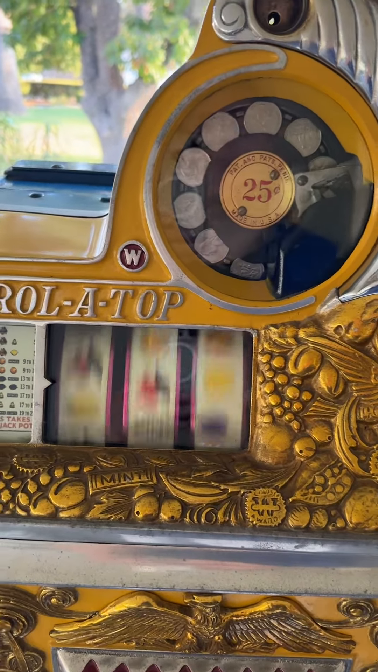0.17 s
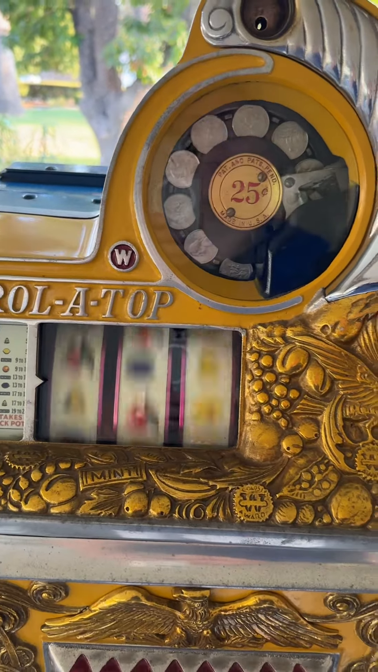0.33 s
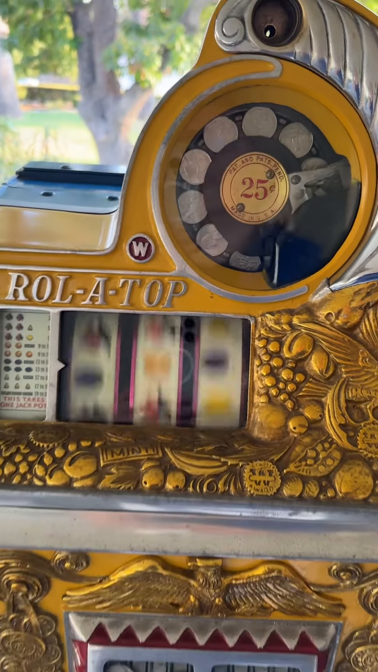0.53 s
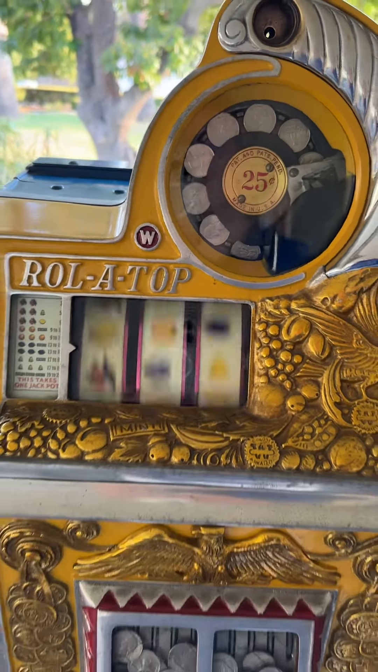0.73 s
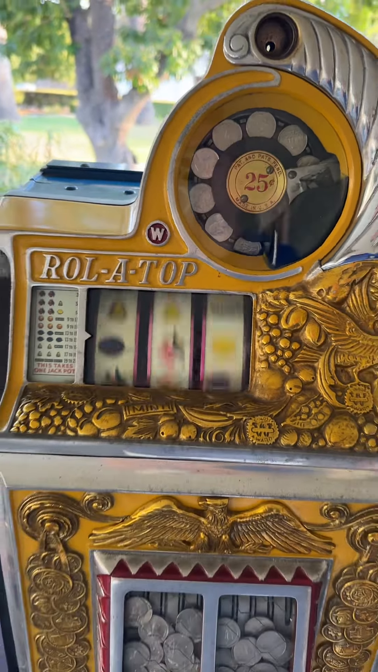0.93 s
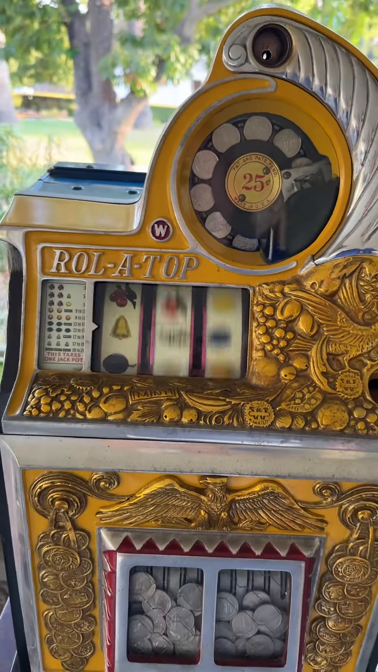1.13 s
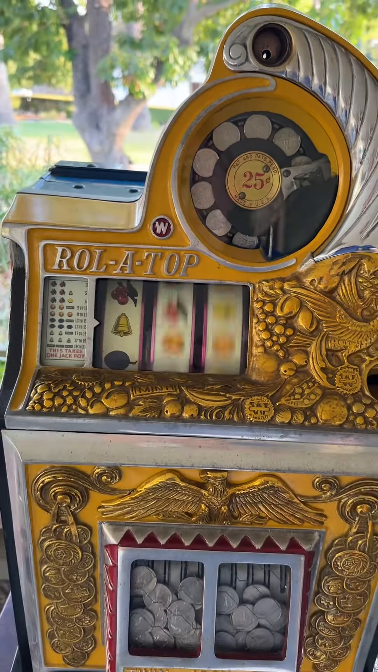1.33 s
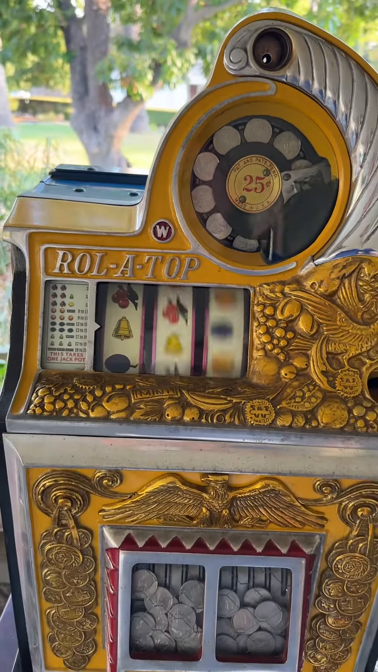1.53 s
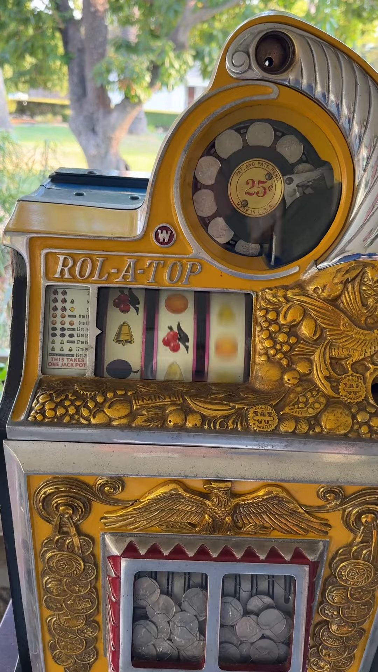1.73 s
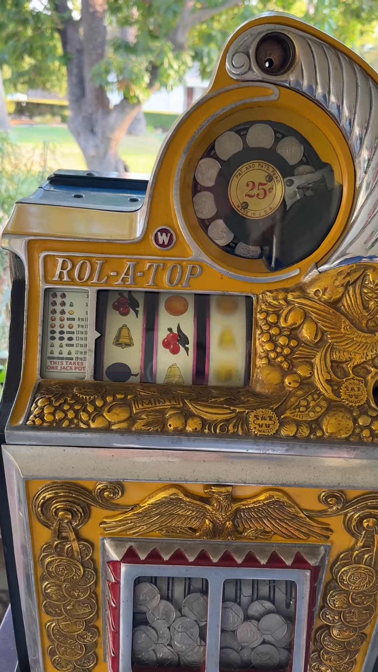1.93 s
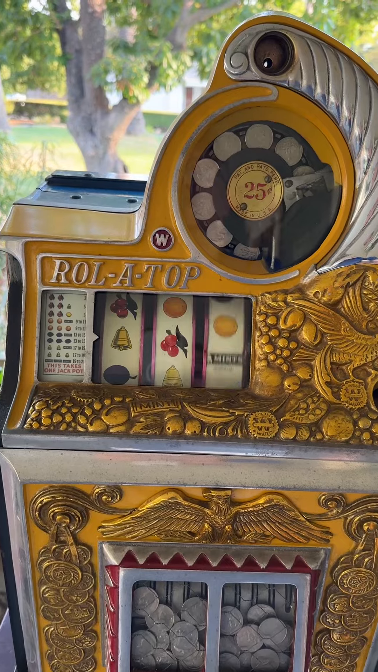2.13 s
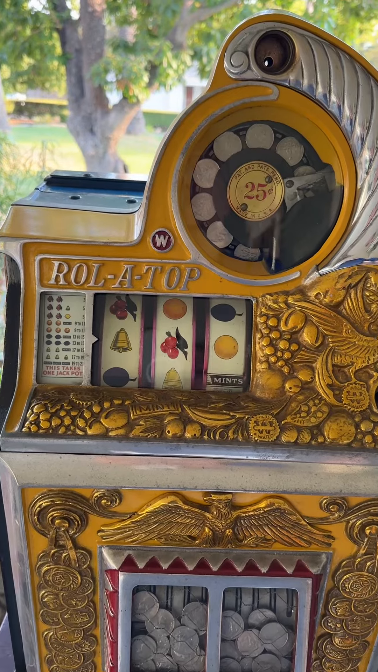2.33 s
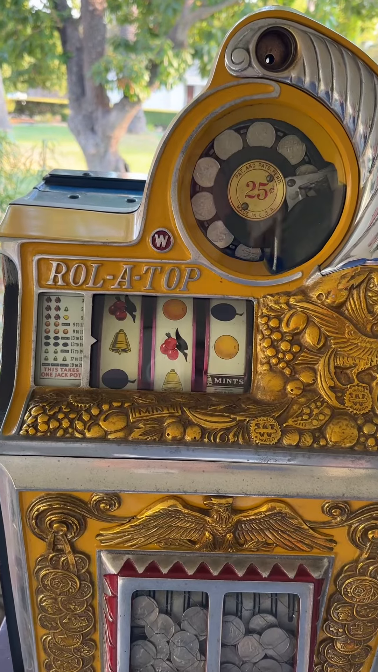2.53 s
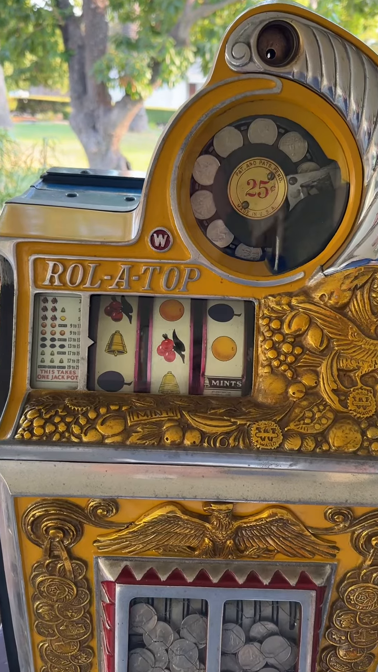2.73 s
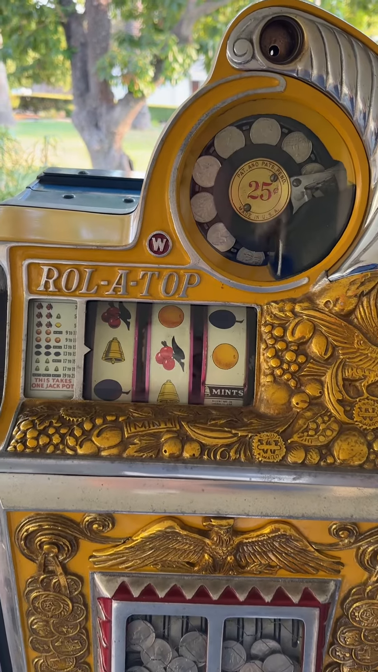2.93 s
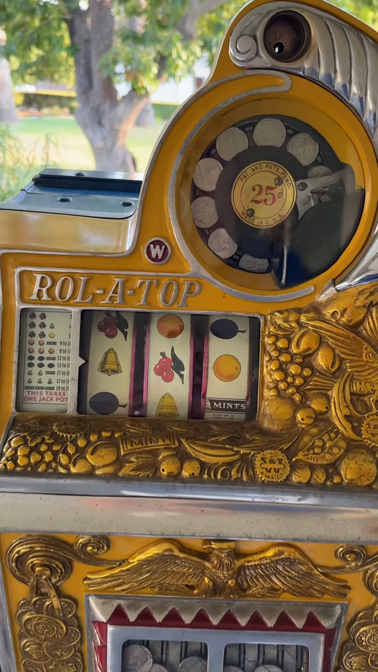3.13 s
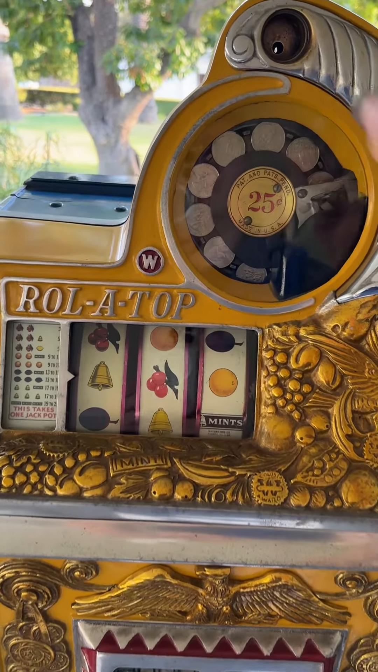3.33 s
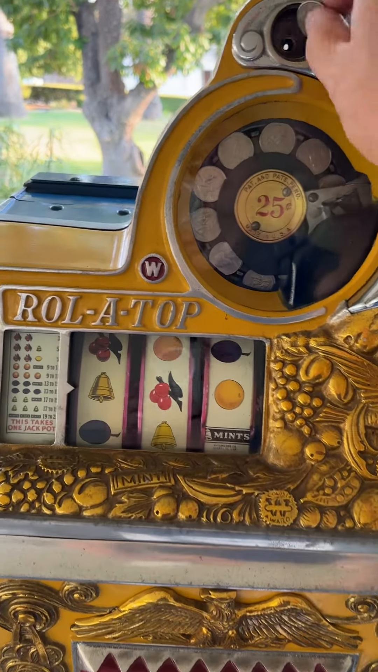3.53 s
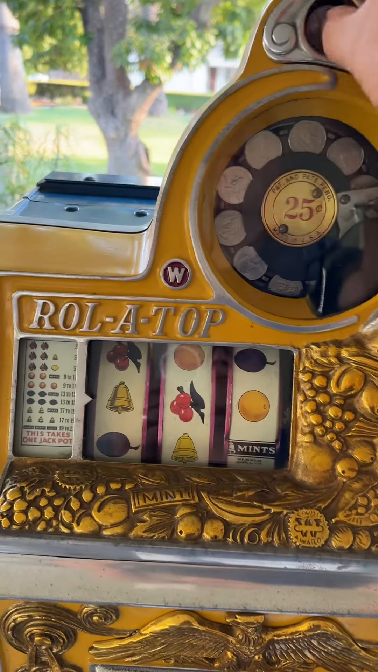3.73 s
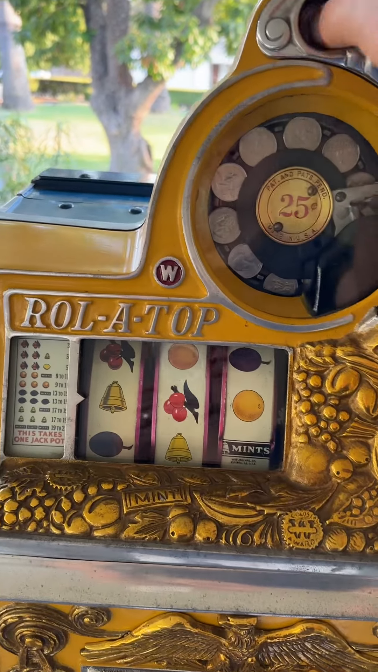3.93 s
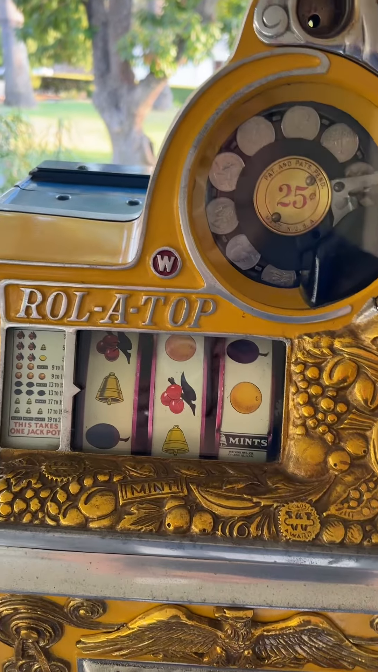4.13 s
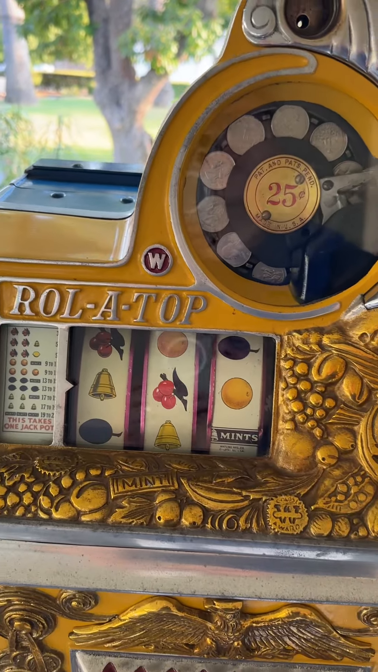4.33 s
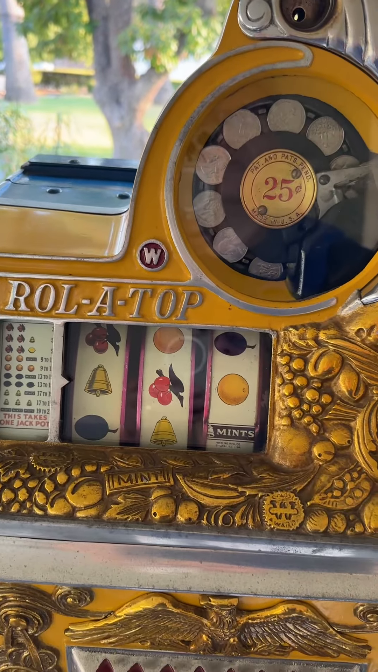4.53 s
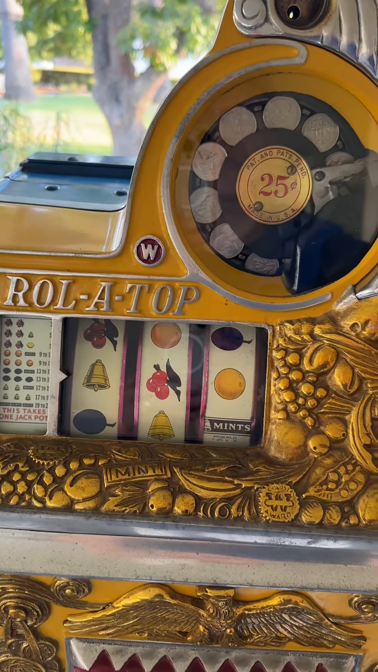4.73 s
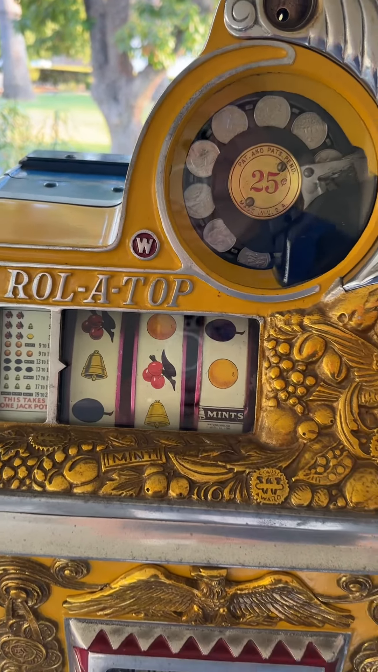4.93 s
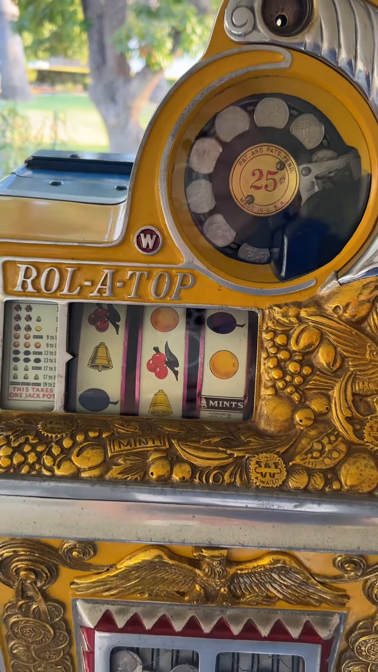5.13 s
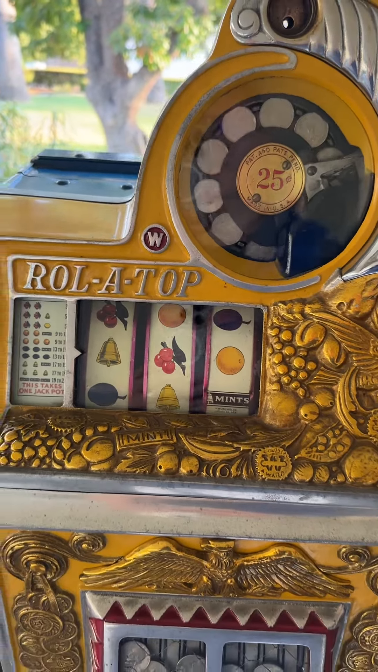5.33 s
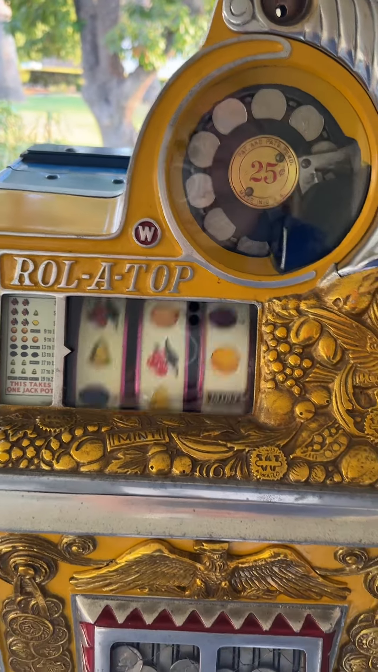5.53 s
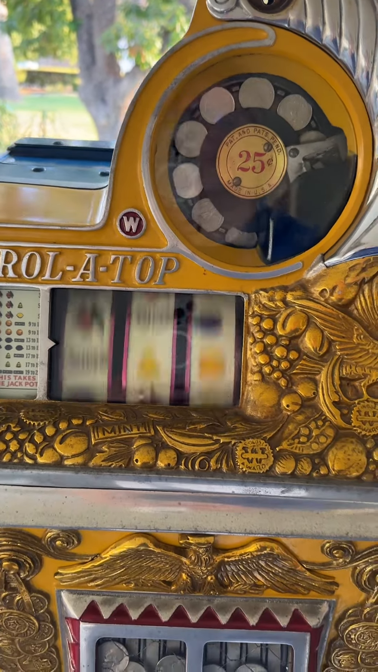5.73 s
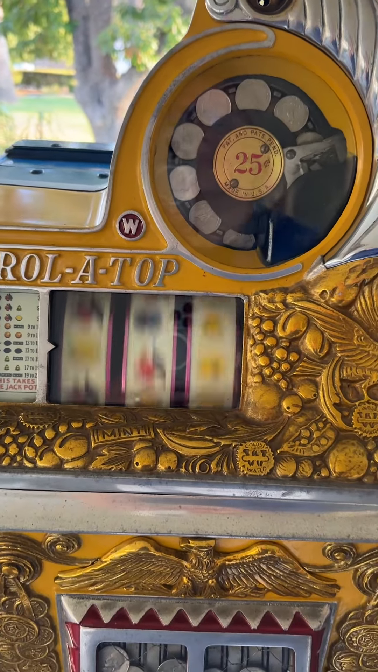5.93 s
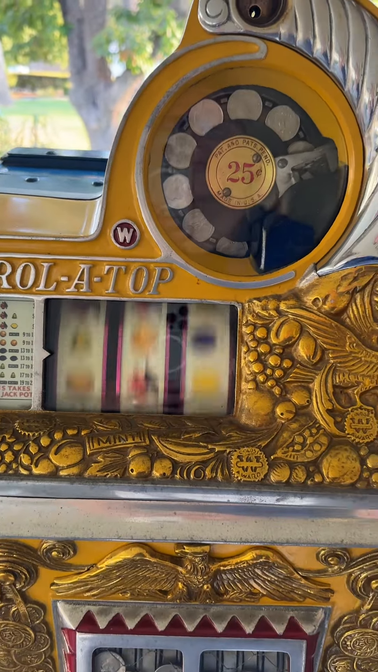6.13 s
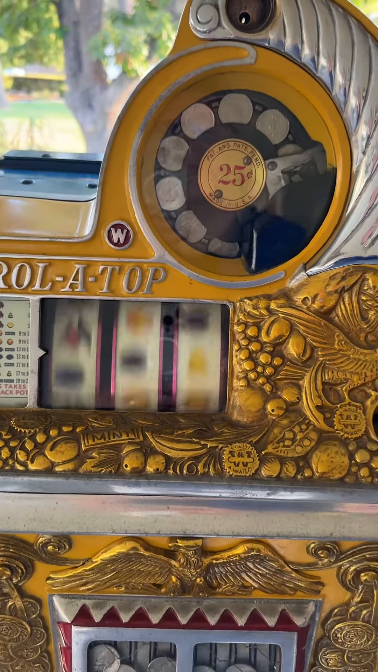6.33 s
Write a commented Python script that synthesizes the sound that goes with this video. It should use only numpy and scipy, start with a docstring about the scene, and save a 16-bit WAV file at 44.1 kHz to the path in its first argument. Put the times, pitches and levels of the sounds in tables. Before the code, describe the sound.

An old mechanical slot machine rattles, its reels lock with ringing clacks, a coin rolls in, and the handle ratchets another spin.

```python
"""Mechanical slot machine outdoors

Three reels spin, then lock one by one with a ringing, bouncing lever. The pay slides snap, a coin rolls
down the chute, the handle cocks the springs, and the same ratchet run-up and knock start the next spin.
Noise bursts make the clashes and shake the metal case; fading sine waves make the ringing parts.
Soft bumps and a low outdoor rumble lie underneath."""
import sys
import numpy as np
from scipy import signal
from scipy.fft import rfft, irfft, next_fast_len
from scipy.io import wavfile
from scipy.ndimage import map_coordinates

SR = 44100
rng = np.random.default_rng(int(sys.argv[2]) if len(sys.argv) > 2 else 0)


def store_pcm(level_fs):
    """Save levels as 16-bit WAV."""
    pcm = np.round(np.clip(level_fs, -1, 1) * 32767).astype(np.int16)
    wavfile.write(sys.argv[1], SR, np.atleast_2d(pcm).T)


N = 285768  # length in samples

# Levels in the tables are relative: gains in the functions set the final loudness.
# A t60 is the time in which a sound fades by 60 dB.
# In every pair of signals, the first is the middle of the stereo picture (mid), the second its width (side).

# Every spin ends its run-up with the same knock.
# Each row: knock time in seconds, strength in dB, strength of the cabinet and case in dB.
SPINS = [(0.2777, -1, 0), (6.2176, -1, -0.5)]
# The handle draws the springs, then lets go.
# Each row: start in seconds, length in seconds, level of the teeth in dB, level of the case in dB.
STROKES = [(5.026, .405, -36, -38.5), (5.506, 0.11, -27.5, -26)]
# What the ticking and rolling coin has in common. Each row: frequency in Hz, level in dB per Hz.
TICK = [(300, -28), (700, -11.5), (1200, -15), (1900, -12.5), (3000, -12.5), (5000, -6.5), (7000, -5),
        (9000, -1), (11000, -1), (13000, -5.5), (16000, -10)]
TEETH_RISE_S = 0.14  # the gear teeth take this long to engage fully


def amp(db):
    """Turn decibels into a gain."""
    return 10 ** (np.asarray(db) / 20)


def unit(x):
    """Scale to an average strength (rms) of 1."""
    return x / np.sqrt(np.mean(x ** 2) + 1e-20)


def along(points, hz):
    """Read a curve of (Hz, value) points between its points, on a log frequency axis."""
    f, v = np.transpose(points)
    return np.interp(np.log(hz + 1), np.log(f + 1), v)


def gains(rows):
    """Turn each dB column into a gain per sample, silent outside the rows."""
    s, *columns = np.transpose(rows)
    t = np.arange(N) / SR
    return np.array([np.interp(t, s, amp(db), left=0, right=0) for db in columns])


def wobble(rate):
    """Make a smooth random curve with this many random points a second."""
    points = rng.standard_normal(int(N * rate / SR) + 4)
    return map_coordinates(points, [np.arange(N) * rate / SR])


def filtered(x, response):
    """Change the strength and phase of each frequency as the response function says."""
    size = 2 * next_fast_len(N // 2 + SR // 4)
    hz = np.fft.rfftfreq(size, 1 / SR)
    return irfft(rfft(x, size) * response(hz), size)[..., :N]


def coloured(x, spectrum):
    """Give a sound this spectrum without smearing it ahead in time; white noise keeps its power."""
    size = 8192
    strength = unit(amp(along(spectrum, np.fft.rfftfreq(size, 1 / SR))))
    # Folding the cepstrum forward in time gives a filter that answers only after its input.
    cepstrum = irfft(np.log(strength))
    cepstrum[1:size // 2] *= 2
    cepstrum[size // 2 + 1:] = 0
    answer = irfft(np.exp(rfft(cepstrum)))
    return signal.oaconvolve(x, answer[None], axes=1)[:, :N]


def resonant(x, peaks):
    """Pass a sound through a few (Hz, width Hz, dB) resonances; white noise keeps its power."""
    def response(f):
        total = 0
        for k, (centre, width, db) in enumerate(peaks):
            peak = 1j * f * width / (centre * centre - f * f + 1j * f * width)
            total = total + (-1) ** k * amp(db) * peak  # alternating signs
        return total / np.sqrt(np.mean(np.abs(total) ** 2))
    return filtered(x, response)


def add(track, s, sound):
    """Mix a sound into a track at time s, cutting what runs past the end."""
    start = max(round(s * SR), 0)
    part = track[..., start:][..., :sound.shape[-1]]
    part += sound[..., :part.shape[-1]]


def grit(rate, depth_db):
    """Make stereo noise of rms 1 whose level flickers as if broken into tiny contacts."""
    return unit(rng.standard_normal((2, N)) * amp(depth_db * wobble(rate)))


def blows(times, dbs, t60, attack, tail_db, tail_t60, chatter_db, scrape_db=-60):
    """Parts scrape as they close; the blow is a noise burst, then a faint, duller wash inside the case."""
    strike, wash = np.zeros((2, N))  # power over time
    t = np.arange(SR // 2) / SR
    approach = np.linspace(0, 1, SR // 70) ** 2
    rise = (1 - np.exp(-t / attack)) ** 2
    decay = rise * np.exp(-2 * np.log(1000) * t / t60)
    tail = rise * np.exp(-2 * np.log(1000) * t / tail_t60)
    for s, power in zip(times, amp(dbs) ** 2):
        add(strike, s - len(approach) / SR, power * amp(scrape_db) ** 2 * approach)
        add(strike, s, power * decay)
        add(wash, s, power * tail)
    dull = signal.butter(3, 10000, fs=SR)
    wash_noise = signal.lfilter(*dull, np.sqrt(wash) * rng.standard_normal((2, N)))
    return np.sqrt(strike) * grit(500, chatter_db) + amp(tail_db) * wash_noise


def rings(times, dbs, modes, attack, scatter_db, detune=0, scramble=1):
    """Each blow rings the (Hz, dB, t60 s) modes as fading sines, with new strengths and slight pitch shifts."""
    track = np.zeros((2, N))
    t = np.arange(SR // 3) / SR
    hz, level, t60 = np.transpose(modes)[:, :, None]
    decay = (amp(level - 60 * t / t60) * (1 - np.exp(-t / attack))).astype("float32")
    turning = (2 * np.pi * hz * t).astype("float32")
    for s, db in zip(times, dbs):
        strength, shift = rng.standard_normal((2, len(modes), 1))
        # With little scramble, the modes start together as one push.
        phase = (2 * np.pi * scramble * rng.random((2, len(modes), 1))).astype("float32")
        stretch = (1 + detune * shift).astype("float32")
        waves = np.sin(turning * stretch + phase)
        level_now = amp(db + scatter_db * strength).astype("float32")
        add(track, s, np.sum(level_now * decay * waves, axis=1))
    return track


def fresh_resonances(x, times, band_hz, count, width_hz, scatter_db):
    """Each blow lands on another spot, so it wakes a new set of many narrow resonances."""
    size = 4096
    decay = np.exp(-np.pi * width_hz * np.arange(size) / SR)
    starts = np.sort(np.clip(np.round(np.asarray(times) * SR), 0, N))
    edges = np.concatenate([[0], starts, [N]]).astype(int)
    rung = np.zeros((2, N))
    for first, last in zip(edges[:-1], edges[1:]):
        hz = np.interp(np.arange(count) + rng.random(count), [0, count], band_hz)
        strength = rng.choice([-1, 1], count) * amp(scatter_db * rng.standard_normal(count))
        lines = np.bincount(np.round(hz * size / SR).astype(int), strength)
        ring = decay * irfft(lines, size)
        ring = ring[None] / np.linalg.norm(ring)
        if last > first:
            add(rung, first / SR, signal.fftconvolve(x[:, first:last], ring, axes=1))
    return rung


def steel(x, times, spectrum, count, width_hz, scatter_db):
    """Small steel parts add many narrow, uneven resonances to a noisy clash."""
    rung = fresh_resonances(x, times, (900, 16000), count, width_hz, scatter_db)
    return coloured(amp(-3) * x + amp(-.5) * rung, spectrum)


def casing(shake, times):
    """The case answers with its main resonances and with panel modes that change from blow to blow."""
    # Main resonances of the metal case. Each row: frequency in Hz, width in Hz, level in dB.
    case_peaks = [(351, 44, 6), (521, 35, 12), (713, 37, 2), (827, 17, 11), (896, 25, -4), (1126, 110, 4.5),
                  (1219, 43, 4), (1622, 150, 0), (1612, 61, 5.5), (2080, 80, -7.5), (2610, 130, -5.5)]
    # Overall colour of the clack. Each row: frequency in Hz, level in dB per Hz.
    clack_spectrum = [(50, -42), (120, -6), (260, 12.5), (420, -7.5), (700, 6), (1200, 1.5), (2000, -3),
                      (3200, -7.5), (5000, -24), (12000, -52.5)]
    panels = fresh_resonances(shake, times, (200, 3200), count=36, width_hz=32, scatter_db=3)
    direct = amp(-7.5) * coloured(shake, clack_spectrum)
    return direct + amp(-15.5) * coloured(panels, clack_spectrum) + amp(-7.0) * resonant(shake, case_peaks)


def outdoors():
    """Noise makes a gently uneven low rumble under faint, steady air."""
    # How the low background swells. Each row: time in seconds, rumble level in dB.
    rumble_levels = [(0.0, -36), (0.32, -36.5), (0.65, -44), (1.51, -51.5), (1.71, -40.5), (3.3, -46.5),
                     (3.68, -37.5), (4.08, -30), (4.15, -44.5), (4.42, -44), (4.64, -77), (4.9, -51.5),
                     (5.77, -34.5), (6.48, -43)]
    # Colours of the rumble and the air. Each row: frequency in Hz, level in dB per Hz.
    rumble_spectrum = [(20, -41.5), (32, -16), (48, 3), (70, 6), (110, -1), (160, -5), (260, -16.5),
                       (400, -38.5), (900, -56)]
    air_spectrum = [(60, -8), (150, 0), (280, 1.5), (450, -6), (900, -12.5), (1500, -17.5), (2500, -24.5),
                    (5000, -31), (9000, -39.5), (12000, -58), (16000, -58)]
    low = gains(rumble_levels) * coloured(grit(9, depth_db=1.5), rumble_spectrum)
    air = coloured(rng.standard_normal((2, N)), air_spectrum)
    width = amp([[0], [6]])  # the open air is wider than the machine
    return amp(2.5) * low + amp(-50.0) * air * width


def bumps():
    """Soft pushes swing a few low cycles, some with a dull knock."""
    # Each row: start in seconds, thud level in dB, thud pitch in Hz, knock level in dB.
    pushes = [(0.197, -19.5, 60.8, -30), (0.423, -20.5, 71.3, -37.5), (0.621, -21.5, 69.8, -55.5),
              (1.76, -25, 54.5, -40), (2.699, -20, 70, -36), (3.464, -16.5, 76, -35),
              (3.532, -23, 57.1, -59), (3.625, -21.5, 66.7, -56), (3.68, -21, 62.2, -57),
              (3.737, -21, 61, -67), (3.813, -17.5, 63.5, -63.5), (3.859, -18, 76.1, -61),
              (3.898, -21.5, 76.6, -56.5), (3.927, -19, 121, -20), (3.974, -15.5, 73.4, -42.5),
              (4.054, -20.5, 83.4, -41), (4.092, -13.5, 79.2, -31.5), (4.252, -35, 91, -42.5),
              (4.391, -30.5, 76.6, -33), (4.475, -29, 71.3, -38), (5.573, -10, 123.7, -39)]
    swell_cycles = 1.25  # a bump swells over this many swings and dies as quickly
    thud = np.zeros((2, N))
    t = np.arange(SR // 6) / SR
    for s, db, hz, _ in pushes:
        u = t * hz / swell_cycles
        add(thud, s, amp(db) * u ** 2 * np.exp(1 - u ** 2) * np.sin(2 * np.pi * hz * t))
    s, _, _, knock_db = np.transpose(pushes)
    knock = blows(s, knock_db + 8.5, 0.054, attack=0.0017, tail_db=-22.0, tail_t60=0.37, chatter_db=0.5)
    dull = [(60, -1.5), (170, 15.0), (300, 2.5), (520, -11.0), (900, -48), (2500, -62.5)]  # (Hz, dB per Hz)
    return thud + coloured(knock, dull)


def handle():
    """The handle knocks dully as it takes up its slack; then the stretching main spring groans."""
    # The handle meeting its stops. Each row: time in seconds, level in dB.
    slack_knocks = [(4.78, -28.5), (4.9005, -26)]
    # Resonances of those knocks. Each row: frequency in Hz, width in Hz, level in dB.
    slack_body = [(258, 32, 5), (387, 63, -3), (513, 51, 4.5), (701, 56, 0.5), (990, 170, -9.5),
                  (1590, 240, -15.5)]
    # The spring. Each row: start in seconds, length in seconds, first pitch in Hz, last pitch in Hz, level in dB.
    groans = [(5.082, 0.11, 216, 307, -33), (5.384, 0.048, 310, 208, -26.5)]
    s, db = np.transpose(slack_knocks)
    knock = blows(s, db, 0.085, attack=0.001, tail_db=-14, tail_t60=0.35, chatter_db=1.5)
    sound = resonant(knock, slack_body)
    for start, length, first_hz, last_hz, groan_db in groans:
        u = np.clip((np.arange(N) / SR - start) / length, 0, 1)
        hz = (first_hz + (last_hz - first_hz) * u) * (1 + 0.0615 * wobble(120))  # gliding, unsteady pitch
        sound += amp(groan_db) * np.sin(np.pi * u) * np.sin(2 * np.pi * np.cumsum(hz) / SR)
    return sound


def gear_runs():
    """List every run of the gear train: the handle's strokes and each spin's run-up."""
    lead_s, length_s = .305, .215  # the gears start this long before the knock and run this long
    teeth_db, case_db = -37.5, -36  # scrape of the teeth and shake of the case, before each spin's strength
    run_ups = [(s - lead_s, length_s, teeth_db + db, case_db + body_db) for s, db, body_db in SPINS]
    return [*STROKES, *run_ups]


def meshing():
    """Uneven tooth impacts, each a short burst, over gritty sliding; stereo noise of rms 1."""
    teeth_per_s, slip = 115, .25  # typical rate of the teeth and its unevenness
    impact_t60 = .022  # seconds, fade of the impact curve
    grind_share = .42  # share of the power that grinds on between impacts
    turns = np.floor(np.cumsum(teeth_per_s * np.exp(slip * wobble(60))) / SR)
    impacts = np.diff(turns, prepend=0) * amp(3 * rng.standard_normal(N))
    bursts = signal.lfilter([1], [1, -np.exp(-np.log(1000) / (impact_t60 * SR))], impacts)
    sliding = unit(amp(3 * wobble(300)))
    power = (1 - grind_share) * unit(bursts) ** 2 + grind_share * sliding ** 2
    return unit(np.sqrt(power) * rng.standard_normal((2, N)))


def gears():
    """Teeth and springs scrape in a dense rattle that drives the case and sets the stored coins shivering."""
    # Colour of the teeth. Each row: frequency in Hz, level in dB per Hz.
    teeth_spectrum = [(500, -48), (1500, -10.5), (2700, -14), (4000, 2), (6000, 2), (8000, 10), (10500, 6),
                      (13000, -5), (16000, 7)]
    # The cabinet under running gears. Each row: frequency in Hz, width in Hz, level in dB.
    gear_body = [(134.7, 10.7, 11), (257, 60, 0.5), (384, 70, -6.5), (637, 87, -6), (842, 115, -11)]
    case_rise_s, run_down_t60 = .03, .2  # seconds; a gear run builds up and dies away
    teeth_level, case_level = np.zeros((2, N))
    for start, length, teeth_db, case_db in gear_runs():
        t = np.arange(N) / SR - start
        run_down = np.exp(-np.log(1000) * np.maximum(t - length, 0) / run_down_t60)
        teeth_level += amp(teeth_db) * np.clip(t / TEETH_RISE_S, 0, 1) ** 2 * run_down
        case_level += amp(case_db) * np.clip(t / case_rise_s, 0, 1) * run_down
    mesh = meshing()
    shake, rattle = case_level * mesh, teeth_level * mesh
    # The load shifts from part to part about 22 times a second.
    shifts = np.sort(rng.uniform(0, N / SR, round(22 * N / SR)))
    scrape = steel(rattle, shifts, teeth_spectrum, count=90, width_hz=45, scatter_db=6)
    shiver = amp(-2.0) * resonant(rattle, [(14700, 250, -3), (15500, 400, -15.0)])
    return scrape + shiver + amp(2) * casing(shake, shifts) + amp(5) * resonant(shake, gear_body)


def catches():
    """Tiny sprung catches snap with a dry, very bright click."""
    # Each row: time in seconds, level in dB.
    latch_clicks = [(0.039, -22), (0.233, -25), (0.6385, -30), (0.741, -33), (4.9485, -21), (5.024, -27),
                    (5.229, -9), (5.402, -11.5), (6.168, -15)]
    # Colour of the click. Each row: frequency in Hz, level in dB per Hz.
    latch_spectrum = [(3000, -28.5), (8000, -6.5), (11000, 3.5), (13000, -6), (15000, 5.5), (16000, -6)]
    s, db = np.transpose(latch_clicks)
    click = blows(s, db - 4, 0.033, attack=0.0003, tail_db=-22.5, tail_t60=0.15, chatter_db=4.5)
    return coloured(click, latch_spectrum)


def coin():
    """The coin ticks against the slot and chute, which ping at each hit; the coin itself rings very high."""
    # The coin hitting the slot and chute. Each row: time in seconds, tick level in dB, ring level in dB.
    coin_hits = [(3.713, -17, -46.5), (3.7336, -13.5, -39), (3.7428, -12, -19), (3.7973, -20.5, -14),
                 (3.8136, -17, -14), (3.845, -16.5, -30), (3.859, -31, -44), (3.9109, -28, -52),
                 (3.9415, -20.5, -39), (4.0669, -33.5, -66), (4.1711, -15.5, -21), (4.2729, -15, -26),
                 (4.3063, -13.5, -17), (4.362, -19.5, -45), (4.4, -19, -49), (4.425, -40, -54),
                 (4.515, -23, -35), (4.5211, -21, -42), (4.5495, -24, -36), (4.571, -18.5, -25),
                 (4.5878, -26, -24), (4.638, -25.5, -36), (4.654, -26, -43)]
    # Ringing of the coin, then of the chute. Each row: frequency in Hz, level in dB, t60 in seconds.
    coin_modes = [(8600, -19, 0.071), (9080, -17.5, 0.13), (14870, -4.5, 0.11), (14650, -11, 0.04),
                  (15400, -2, 0.066), (15700, -6, 0.04)]
    chute_modes = [(745, -18, 0.46), (1350, -6.5, 0.15), (2960, -6, 0.15), (3900, -2, 0.082),
                   (4660, -5, 0.088), (5200, 5, 0.035), (6540, -6, 0.043), (8500, 3, 0.024),
                   (8400, 10, 0.04)]
    # Plates the coin passes. Each row: first second, last second, pitch in Hz, t60 in seconds,
    # ping in dB over the tick.
    chute_plates = [(4.289, 4.45, 2906, 0.27, -32), (4.56, 4.596, 3990, .13, -15)]
    # The coin rolling on its edge. Each row: time in seconds, level in dB.
    coin_roll = [(4.52, -61), (4.56, -42), (4.6, -45), (4.655, -44), (4.7, -65)]
    rebound_db = -13.5  # the coin touches again, more softly, 12 to 18 ms after each hit
    rebounds = [(s + rng.uniform(0.012, 0.018), tick + rebound_db, ring + rebound_db)
                for s, tick, ring in coin_hits]
    s, tick_db, ring_db = np.transpose([*coin_hits, *rebounds])
    ticks = blows(s, tick_db - 8, 0.037, attack=0.00034, tail_db=-12.5, tail_t60=0.19, chatter_db=0.5)
    ticks = steel(ticks, s, TICK, count=45, width_hz=170, scatter_db=5)
    chute = rings(s, tick_db - 25.5, chute_modes, attack=0.0012, scatter_db=3.0, detune=0.036)
    for first, last, hz, t60, db in chute_plates:
        on = (s > first) & (s < last)
        chute += rings(s[on], tick_db[on] + db, [(hz, 0, t60)], attack=0.0006, scatter_db=1.5, detune=0.0029)
    roll = gains(coin_roll) * coloured(grit(300, depth_db=3), TICK)
    ring = rings(s, ring_db + 4.5, coin_modes, attack=0.00044, scatter_db=0.5, detune=0.0019)
    flutter = unit(1 + .55 * np.tanh(wobble(250)))  # the spinning coin grazes the chute
    return ticks + roll + (chute + ring) * flutter


def reel_stops():
    """Each lever bounces in its reel's notch and rings with its own pitches while the reel rocks."""
    # The levers bouncing, then settling. Each row: time in seconds, steel clash level in dB,
    # case clack level in dB, lever ring level in dB.
    stops = [(0.8617, -9.5, -23, -8.5), (0.878, -12, -23, -15.5), (0.9223, -17.5, -23, -16.5),
             (0.933, -26, -48, -29), (0.9812, -19, -33.5, -35), (0.991, -21.5, -30, -23.5),
             (1.1302, -32, -36, -45), (1.17, -24, -38, -32), (1.22, -36, -41.5, -47),
             (1.2406, -31.5, -44, -47), (1.4115, -11.5, -23, -17.5), (1.429, -18.5, -22, -13.5),
             (1.44, -12.5, -20, -12.5), (1.474, -15.5, -24.5, -12.5), (1.518, -17.5, -26.5, -19.5),
             (1.528, -34, -34, -38), (1.584, -18.5, -28, -24), (1.708, -32.5, -60, -55),
             (1.7282, -29.5, -36.5, -36), (1.7671, -28, -39, -35.5), (1.8136, -35, -46, -43),
             (1.8306, -41, -44, -43), (1.9774, -9.5, -27.5, -8), (1.991, -17.5, -32, -19),
             (2.005, -13, -23, -25.5), (2.0446, -12, -25.5, -18.5), (2.064, -24, -28, -19.5),
             (2.101, -15, -27, -14.5), (2.195, -20, -31.5, -19.5), (2.318, -26.5, -33, -33.5),
             (2.3527, -31, -38, -29.5), (2.39, -38, -34.5, -38.5), (2.4088, -39.5, -34.5, -38.5)]
    # Ringing of the three levers. Each row: frequency in Hz, level in dB, t60 in seconds.
    left_lever = [(2940, -17, .2), (3850, -17, .22), (4370, -19, 0.25), (6130, -2, .2), (7050, 1.5, 0.28),
                  (7250, -6.5, 0.27), (7270, -0.5, 0.23), (9650, 6, 0.084), (10690, 12, 0.083)]
    middle_lever = [(2190, -16, .14), (2930, -12, 0.13), (5480, -7, 0.11), (7040, -1.5, 0.19),
                    (7040, -9.5, 0.182), (7860, -1, .26), (8000, -1, .18), (8210, 4, 0.14),
                    (10850, 6, 0.12)]
    right_lever = [(4070, -25, 0.3), (5600, -17, .15), (6760, -2.5, 0.047), (7760, -2, 0.1),
                   (8000, 0.5, 0.1), (8200, -8.5, 0.22), (9674, 1, 0.06), (10030, 10, 0.066)]
    # Ringing of a rocking reel, the right reel's rim, and the low swing of the stand, with the same columns.
    drum = [(138.8, -2, 0.53), (218.4, -2.5, 0.32), (249.3, -1, 0.34), (283.7, -5.5, 0.5)]
    right_rim = [(1598, -0.5, 0.23), (1970, -8.5, 0.13), (499, 5, .2), (720, -6, .16)]
    stand = [(48.8, -4.5, 0.37), (66.3, -1, 0.2), (92, -3, .14), (134, -13, 0.23)]
    # The tin shell of each reel colours its clack. Each row: frequency in Hz, width in Hz, level in dB.
    reel_shells = [(1180, 180, -7.5), (1100, 370, -8.5), (700, 260, -10)]
    # Colour of the clash. Each row: frequency in Hz, level in dB per Hz.
    stop_spectrum = [(500, -18.5), (1500, -10), (3000, -14.5), (4500, -9), (6000, -6.5), (8000, -5),
                     (10500, 1.5), (13000, 1.5), (16000, -0.5)]
    # The left, middle and right levers take over in turn from these times in seconds.
    reel_locks_s = (.8, 1.35, 1.9)

    s, clash_db, clack_db, ring_db = np.transpose(stops)
    clash = blows(s, clash_db - 5, 0.095, attack=0.0008, tail_db=-15.5, tail_t60=0.45,
                  chatter_db=3.2, scrape_db=-24)
    sound = steel(clash, s, stop_spectrum, count=80, width_hz=45, scatter_db=4)
    shake = blows(s, clack_db + 0.5, 0.12, attack=0.0027, tail_db=-15.5, tail_t60=0.44, chatter_db=3.0)
    sound += amp(-1.5) * casing(shake, s)
    drum_db = -32 + 0.25 * clash_db  # the reel's rocking grows only slowly with the clash
    sound += rings(s, drum_db, drum, attack=0.011, scatter_db=4, detune=0.014)
    # Each contact also shakes the stand.
    sound += rings(s, np.full(len(s), -34.5), stand, attack=0.0043, scatter_db=1.5, detune=.03)
    reel = np.searchsorted(reel_locks_s, s) - 1  # which reel each blow belongs to
    locking = np.searchsorted(reel_locks_s, np.arange(N) / SR) - 1  # the same for every sample
    right = s[reel == 2]
    sound += rings(right, np.full(len(right), -44), right_rim, attack=0.0029, scatter_db=2, detune=0.002)
    buzz = unit(amp(2 * wobble(350)))  # a loose lever buzzes against its notch as it rings
    for k, modes in enumerate((left_lever, middle_lever, right_lever)):
        hit = reel == k
        ring = rings(s[hit], ring_db[hit] - 14, modes, attack=0.00032, scatter_db=1.5, detune=0.002)
        hz, width, db = reel_shells[k]
        sound += buzz * ring + amp(db) * resonant(shake * (locking == k), [(hz, width, 0)])
    return sound


def ratchet(knock, db):
    """A pawl skips over eight teeth before the knock, on average a little weaker each time."""
    # The first tooth: steel clash, case clack, cabinet boom and hollow frame ring, each in dB.
    first_tooth = (-20, -36, -25, -32.5)
    from_s, gap_s = -.2235, 0.018  # first tooth, counted from the knock, and time between teeth
    loss_db, scatter_db = 0.95, 2.5  # loss a tooth and unevenness of the teeth
    tooth = np.arange(8)
    strength = db - loss_db * tooth + scatter_db * rng.standard_normal(len(tooth))
    return [(knock + from_s + gap_s * k, *(np.array(first_tooth) + strength[k])) for k in tooth]


def lever_blows():
    """List the single blows, the levers and ratchet of each run-up, and stray clicks as the handle moves."""
    # Levers, pawls and slides. Each row: time in seconds, steel clash level in dB, case clack level in dB,
    # cabinet boom level in dB, hollow frame ring level in dB.
    single_blows = [(0.64, -47, -74, -66, -73), (0.7415, -35.5, -83.5, -59, -75),
                    (2.6654, -3, -32, -46.5, -47), (2.6796, -6.5, -21.5, -28.5, -34.5),
                    (2.6961, -4, -16.5, -22, -33), (2.7168, -12, -24.5, -19.5, -38.5),
                    (2.7433, -13, -24.5, -17.5, -44.5), (3.4481, -5.5, -17, -20, -31),
                    (3.496, -22.5, -31.5, -26, -34), (4.9011, -35, -38, -26.5, -28),
                    (4.9495, -27.5, -37.5, -29.5, -61), (5.0243, -27.5, -37, -26, -46),
                    (5.0743, -39, -50, -19, -49), (5.1031, -24, -31.5, -42, -45),
                    (5.122, -19, -30, -32, -38), (5.2288, -18.5, -32, -39, -47), (5.245, -9, -16, -29, -41),
                    (5.2848, -12.5, -23, -23.5, -40), (5.3045, -12.5, -21, -28, -26),
                    (5.319, -15.5, -26.5, -33, -38), (5.337, -20, -28, -27, -33),
                    (5.4011, -17.5, -29, -18, -38), (5.4135, -23, -44, -21.5, -41),
                    (5.452, -15.5, -28, -35, -37), (5.4595, -4, -16.5, -21, -29),
                    (5.5202, -6, -12.5, -14.5, -37), (5.5444, -10, -12, -14, -29),
                    (5.5618, -9, -22.5, -7.5, -34), (5.6139, -8, -10, -12.5, -27),
                    (5.9064, -35, -38, -26, -36.5)]
    # The levers of one run-up, with the same columns but the time counted from the knock.
    run_up = [(-.264, -36, -37, -23, -27.5), (-.246, -42, -37.5, -25, -26.5), (-.127, -20.5, -29, -33, -34),
              (-.048, -20, -37, -32, -55), (0, -18, -18, -10, -10), (0.0515, -28.5, -33, -27, -39)]
    pawls_per_s = 22  # stray clicks a second in a handle stroke
    pawl_db, pawl_scatter_db = 10.5, 2  # their level over the teeth and its spread either way
    slack_db = 6.5  # they are up to this much weaker before the teeth have engaged
    rows = list(single_blows)
    for s, db, body_db in SPINS:
        for lead, clash, clack, boom, frame in run_up:
            rows.append((s + lead, clash + db, clack + db, boom + body_db, frame + db))
        rows += ratchet(s, db)
    for start, length, teeth_db, case_db in STROKES:
        for place, size in rng.random((round(length * pawls_per_s), 2)):
            s = start + place * length
            engaged = min(place * length / TEETH_RISE_S, 1)
            db = pawl_db + pawl_scatter_db * (2 * size - 1) - slack_db * (1 - engaged)
            case = case_db + db
            rows.append((s, teeth_db + db, case - 6.5, case - 4.5, case - 17))
    return np.transpose(rows)


def levers():
    """Steel parts clash and ring; the case clacks, the frame rings hollow and the cabinet booms more slowly."""
    # Colour of the clash. Each row: frequency in Hz, level in dB per Hz.
    clash_spectrum = [(500, -29.5), (1500, 0), (2700, -1), (4000, -1.5), (6000, 2.5), (8000, 0),
                      (10500, -2), (13000, -6), (16000, -13)]
    # Ringing of the linkage, frame, base plate and cabinet.
    # Each row: frequency in Hz, level in dB, t60 in seconds.
    linkage = [(5150, -3, 0.17), (5570, -13, 0.17), (6099, -8.5, 0.17), (6600, -3, 0.088),
               (6700, -7, 0.085), (7450, -8, 0.12)]
    frame_modes = [(276, -9, .1), (380, -14.5, 0.32), (705.6, -3, 0.12), (908, -9, 0.095),
                   (1014, -10.5, 0.11), (1247, -23, 0.034), (1510, -9.5, 0.042), (2160, -9, 0.028),
                   (2495, -9.5, .04)]
    base_plate = [(955, -3.5, 0.1), (1054, -11, 0.071), (1150, -1.5, .1), (1234, 0.5, 0.091)]
    cabinet = [(134.8, -0.5, 0.22), (183.2, -11, 0.24), (222, -8, 0.2), (253.5, -12.5, 0.26),
               (277.3, -16.5, 0.2)]
    # Heavy parts hitting the base plate. Each row: time in seconds, level in dB.
    slams = [(3.4496, -22), (5.459, -27), (5.5212, -18.5), (5.5608, -23), (5.6155, -16.5)]
    s, clash_db, clack_db, boom_db, frame_db = lever_blows()
    clash = blows(s, clash_db - 6.0, 0.052, attack=0.00067, tail_db=-21.5, tail_t60=0.44,
                  chatter_db=4.0, scrape_db=-20.5)
    clash = steel(clash, s, clash_spectrum, count=120, width_hz=50, scatter_db=3)
    shake = blows(s, clack_db + 5.0, 0.085, attack=0.0013, tail_db=-22.0, tail_t60=0.73,
                  chatter_db=1.5, scrape_db=-13.0)
    clack = casing(shake, s)
    ring = rings(s, clash_db - 32.0, linkage, attack=.001, scatter_db=3.0, detune=0.0033)
    frame = rings(s, frame_db - 2, frame_modes, attack=0.0006, scatter_db=1.5, detune=0.019)
    plate = rings(*np.transpose(slams), base_plate, attack=0.001, scatter_db=1.0, detune=0.0056)
    boom = rings(s, boom_db, cabinet, attack=0.0017, scatter_db=3.0, detune=0.0095, scramble=0.22)
    return clash + clack + ring + frame + plate + boom


def scene():
    """The machine is heard from straight ahead, with some width from its panels."""
    # Stereo width at each pitch. Each row: frequency in Hz, gain of the side signal in dB.
    spread = [(100, -17), (300, -25.5), (700, -9), (1500, -11.5), (2700, -4.5), (4500, -8), (6600, -13.5),
              (9000, -15.5), (12500, -23.5), (16000, -14)]
    background = outdoors() + bumps()
    machine = handle() + gears() + catches() + coin() + reel_stops() + levers()
    mid, side = background + machine
    side = filtered(side, lambda hz: amp(along(spread, hz)))
    return np.array([mid + side, mid - side])


def record(dry):
    """Two microphone ports differ in level and phase; the loudest peaks are rounded and the band is limited."""
    # Each row: frequency in Hz, radians by which the left port leads.
    port_phase = [(200, 0), (600, -.4), (1640, 0), (2500, -.3), (4400, 0), (5000, -3.3), (5300, -5.5),
                  (6600, -6.3), (8500, -7.4), (11100, -9.1), (12500, -9.42), (13700, -9.6), (16000, -10.2)]
    # Each row: frequency in Hz, left level minus right level in dB.
    port_balance = [(60, -1.5), (110, -2), (200, -0.5), (380, 0), (700, -4.5), (1290, -4.5), (2380, 2),
                    (4400, 0), (8120, 0), (15000, 0)]
    top_hz = 16100  # very little passes above this

    def ports(hz):
        half = amp(along(port_balance, hz) / 2) * np.exp(1j * along(port_phase, hz) / 2)
        return np.array([half, 1 / half])  # each port takes half of the difference
    heard = filtered(dry, ports)
    rounded = heard / (1 + (heard / .88) ** 6) ** (1 / 6)
    return filtered(rounded, lambda hz: 1 / np.sqrt(1 + (hz / top_hz) ** 160))


dry = scene()
out = record(dry)
store_pcm(out)
```